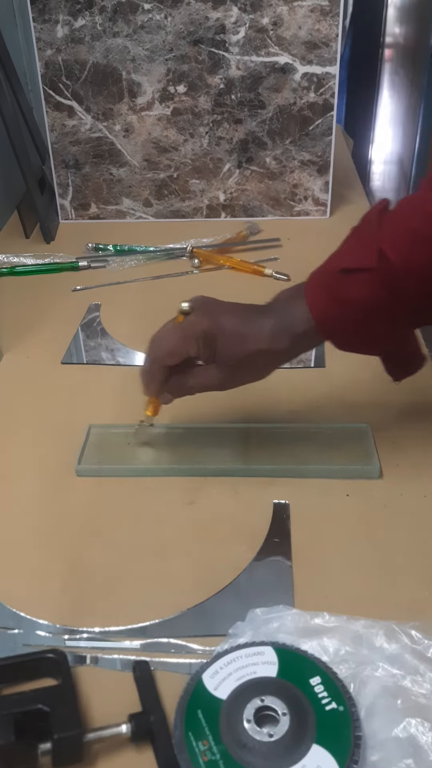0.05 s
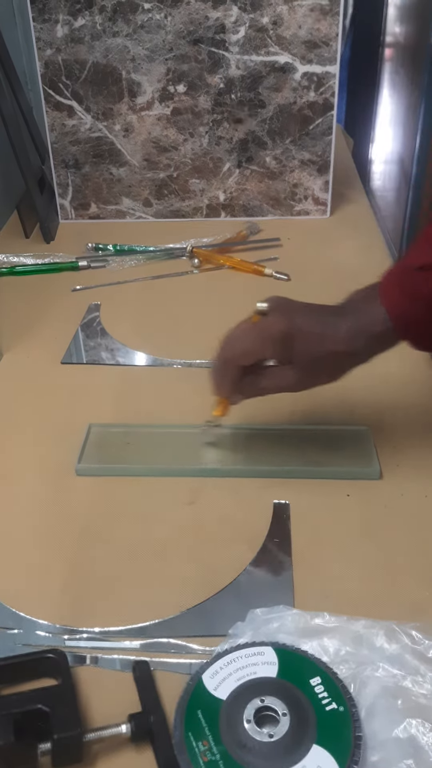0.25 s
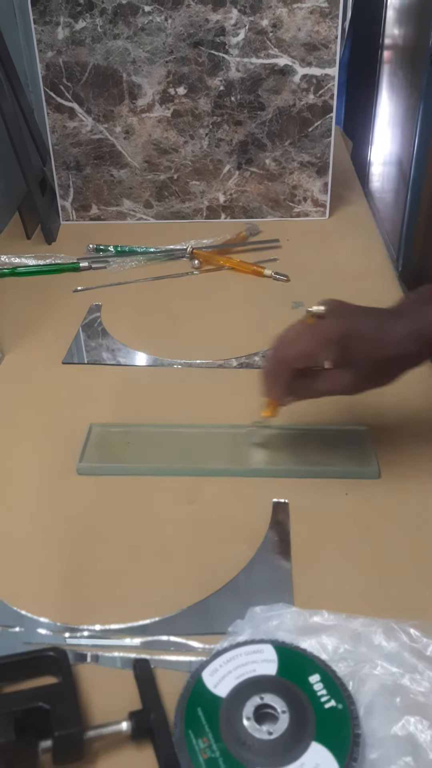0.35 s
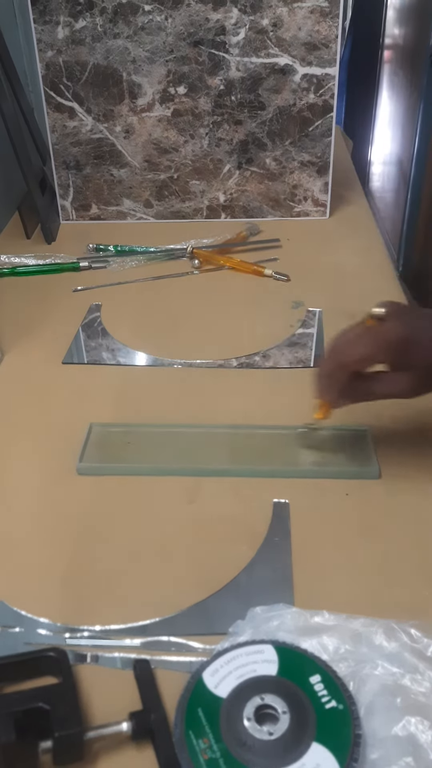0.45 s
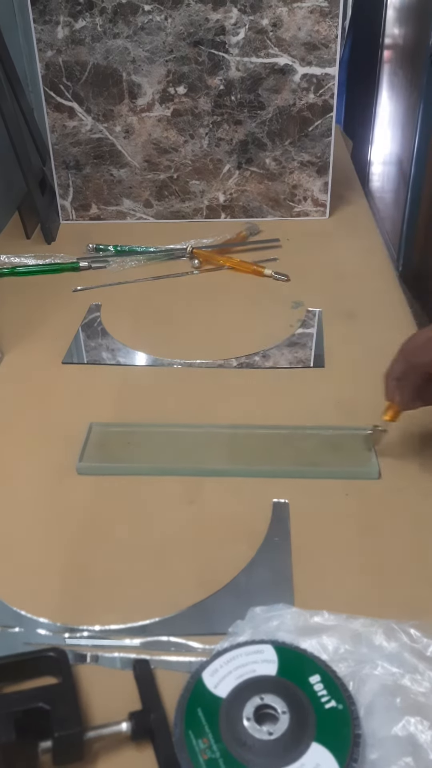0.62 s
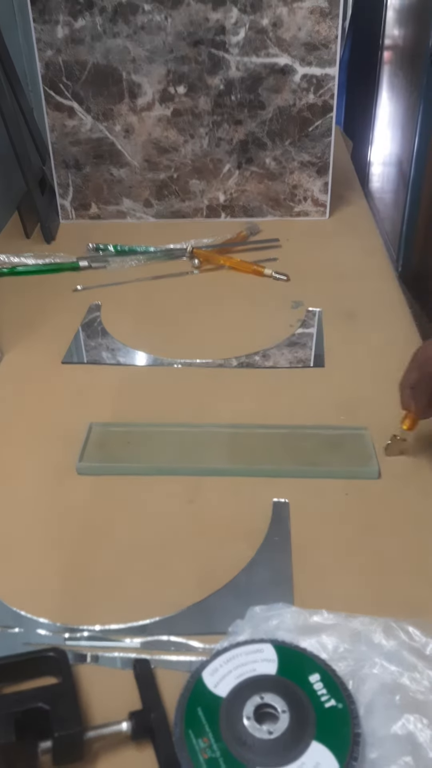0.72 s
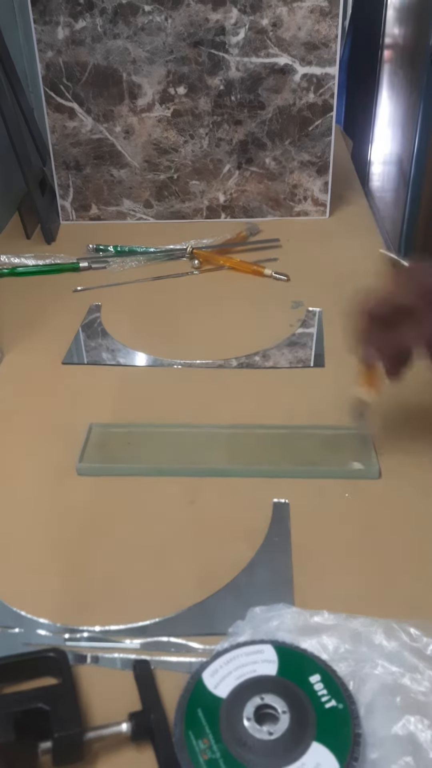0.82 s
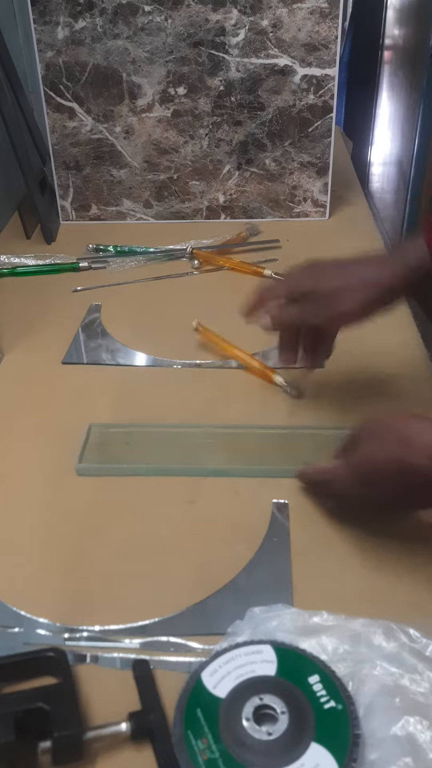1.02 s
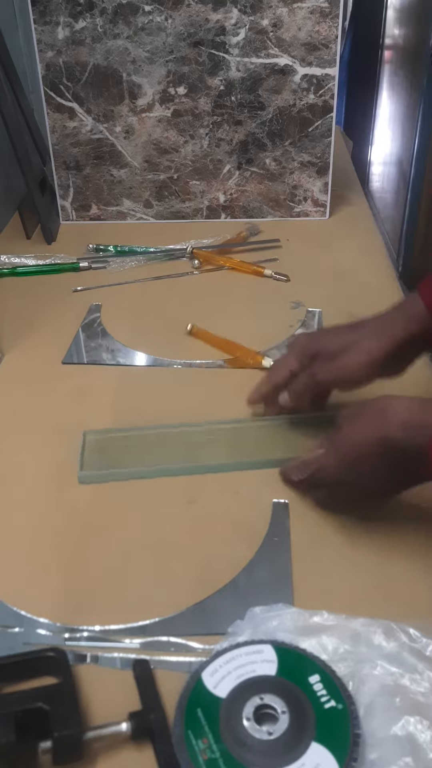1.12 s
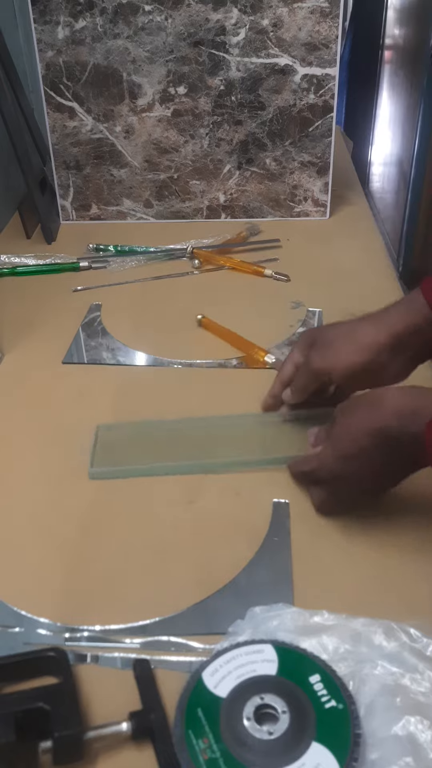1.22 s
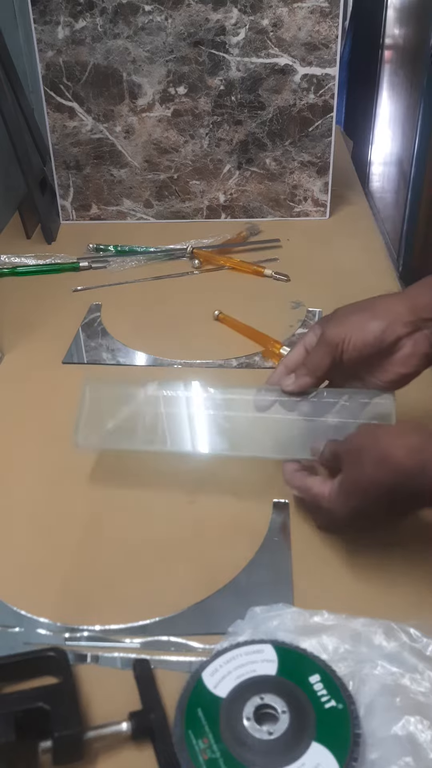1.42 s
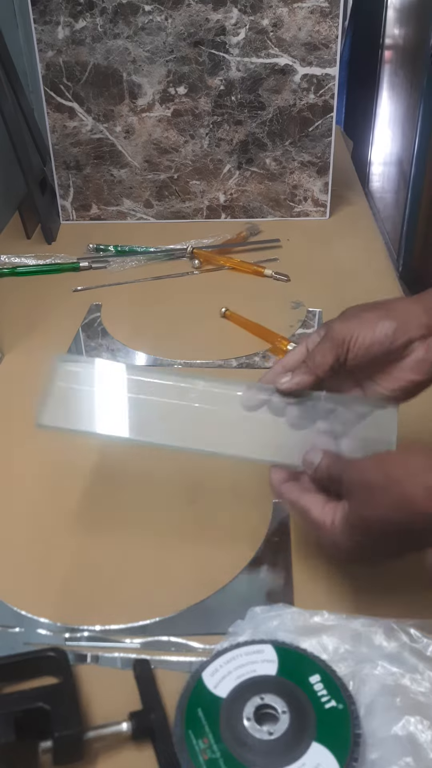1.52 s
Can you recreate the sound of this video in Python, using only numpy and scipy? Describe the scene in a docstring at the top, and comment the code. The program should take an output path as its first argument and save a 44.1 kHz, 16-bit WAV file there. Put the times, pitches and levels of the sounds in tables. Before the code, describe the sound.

A glass cutter scores a glass strip with a fine, squeaky hiss, then slips off the end and knocks the workbench. The tool is tossed down, clinking and rattling, heard close in a small room over low rumble.

```python
"""A workbench in a small hard room, heard from close by over a low rumble.
A glass cutter's wheel scores a strip of glass: tiny cracks make a fine hiss in which the strip's
bending modes swell, fade and squeak. The wheel runs off the end and knocks on the bench, and the
freed strip rings. The cutter is tossed aside, clinks and bounces; hands bump the bench to lift
the strip."""
import sys
import numpy as np
from scipy import signal
from scipy.fft import rfft, irfft
from scipy.io import wavfile

SR = 44100
rng = np.random.default_rng(int(sys.argv[2]) if len(sys.argv) > 2 else 0)


def generate_wav(sig):
    """Save sig (samples, or channels by samples) to the path in sys.argv[1] as 16-bit PCM at SR."""
    pcm = np.round(np.clip(np.atleast_2d(sig).T, -1, 1) * 32767).astype(np.int16)
    wavfile.write(sys.argv[1], SR, pcm)


N = 68355
T = np.arange(N) / SR

# room tone: (frequency [Hz], left [dB/Hz], right [dB/Hz])
ROOM_TONE = [(20, -94, -85), (46, -65.5, -64.5), (105, -52.5, -53.5), (148.5, -65, -60),
             (407, -64.5, -66.5), (604, -72, -72.5), (2230, -83, -83), (5200, -94.5, -93),
             (15300, -101, -103)]
# fader ride on the room tone: (time [s], gain [dB])
ROOM_TONE_FADE = [(0, 1.26), (1.15, 0.5), (1.45, -2)]
# stereo image of the noise layers: (frequency [Hz], left-right correlation [0-1])
CORRELATION = [(50, 0.56), (300, 0.65), (800, 0.22), (2000, 0.033), (6000, 0.029), (15000, 0.029)]

# hands bump bench and microphone: (peak time [s], level [dB], pitch [Hz], half length [s], pan [dB])
BUMPS = [(0.352, -24, 78, 0.0084, -21), (0.4862, -7, 116.5, 0.0065, -55), (0.631, -20.5, 87, 0.0061, -41),
         (.657, -18.5, 105, 0.0085, -6), (0.77, -21, 83.3, 0.0062, 25), (.834, -20.5, 150.6, 0.007, 16),
         (.839, -22, 75.6, 0.016, 34), (.954, -21, 221, 0.0066, -3.5), (1.032, -28.5, 151, 0.011, -5),
         (1.1052, -18, 106, 0.0085, 1), (1.2314, -11.5, 147, 0.0038, -3.5), (1.251, -21, 116, 0.011, -0.5),
         (1.408, -28.5, 62, 0.015, -19)]
# blows on the bench top: (time [s], level [dB], pan [dB], low cut [Hz])
KNOCKS = [(.650, -9, 18, 595), (.6607, 0.5, -4.5, 61), (.689, -15, 15, 213), (0.9887, -9, -1, 232),
          (1.008, -20.5, 0, 160)]
# body of the bench: (frequency [Hz], level [dB], t60 [s])
BENCH_MODES = [(63.7, -18, 0.33), (120.2, -28, 0.65), (210.2, -16.5, 0.16), (314.6, -12, 0.063),
               (422.8, -19, 0.16), (510, -19, 0.14), (539.4, -19, 0.14), (598, -27, 0.35),
               (660, -16.5, 0.065), (816, -16.5, 0.062)]
# dull thud of a knock: (frequency [Hz], level [dB/Hz])
THUD_SPECTRUM = [(40, -77), (130, -34.5), (400, -42.5), (750, -39.5), (1050, -56.5), (2200, -56),
                 (4000, -68), (12500, -70.5), (16000, -95)]

# ticks of glass chips and edges: (time [s], level [dB], pan [dB])
TICKS = [(.567, -5, 5), (.6618, 2, 11), (.8692, -4, 7)]
# their thin top end: (frequency [Hz], level [dB/Hz])
TICK_SPECTRUM = [(2000, -99), (8500, -101), (12500, -67), (16000, -69)]

# the handle taps down and rattles: (time [s], level [dB], pan [dB])
TAPS = [(1.1835, 4.5, 7), (1.1875, 3, 0.5), (1.214, -9, -7), (1.259, -7.5, -4)]
# click of a tap: (frequency [Hz], level [dB/Hz])
TAP_SPECTRUM = [(1200, -84), (2000, -64.5), (3200, -66.5), (4300, -68), (7500, -74), (13300, -77.5),
                (14800, -92)]
# ring of the handle: (frequency [Hz], level [dB], t60 [s])
TAP_MODES = [(2038, -35.5, 0.16), (5700, -59, 0.15)]

# the cutter lands and bounces: (time [s], level [dB], pan [dB])
CLINKS = [(.9888, -0.5, -2), (1.007, -12.5, 5), (1.1195, -21.5, -16), (1.184, -21, -4)]
# ring of the cutter's metal: (frequency [Hz], level [dB], t60 [s])
CLINK_MODES = [(1520, -29.5, 0.26), (1841, -38, 0.21), (2153, -28.5, 0.37), (2725, -31.5, 0.45),
               (2938, -28, 0.31), (3760, -29.5, 0.22), (4900, -28, 0.17), (5034, -37.5, 0.3),
               (5610, -29.5, 0.29), (5993, -46, 0.32), (6620, -17.5, 0.049), (6950, -13, 0.033),
               (7340, -29, 0.11), (8240, -33, 0.29), (8645, -35, 0.39), (8900, -25, 0.33),
               (9600, -33, 0.25), (10520, -27, 0.36), (12230, -24.5, 0.27), (12200, -28, 0.22),
               (13600, -20, 0.17), (14665, -32, 0.26)]
# stereo spread of that ring: (frequency [Hz], pan [dB])
CLINK_PAN = [(2100, -2), (2900, 12), (3800, -1), (5900, -4), (6800, -19), (8600, 13.5)]
# sharp attack of the contact: (frequency [Hz], level [dB/Hz])
CLINK_ATTACK = [(800, -43.5), (2000, -72), (4500, -50.5), (7200, -53), (9500, -52.5), (13500, -52.5),
                (15200, -64), (16200, -80)]
# the room's answer to a clink: (frequency [Hz], left [dB/Hz], right [dB/Hz])
CLINK_TAIL = [(494, -56, -51.5), (1230, -62.5, -63), (3050, -61, -56), (4150, -62.5, -66),
              (8400, -63.5, -61), (10600, -62.5, -76), (14400, -67, -67), (15800, -88, -85)]

# the wheel catches: (peak time [s], pitch [Hz], level [dB], half length [s], pan [dB])
SQUEAKS = [(0.303, 10630, -44, 0.013, 3), (0.388, 2385, -41, 0.015, -5), (0.402, 7300, -39, 0.008, -1),
           (0.511, 7290, -39, 0.023, -4), (0.607, 4590, -29.5, 0.0047, -8), (0.625, 4620, -33, 0.0063, -10)]
# the scoring gesture: (time [s], wheel position [share of the strip's length], pressure [dB])
STROKE = [(0, 0.166, -1), (0.092, 0.251, -1.5), (0.255, 0.423, 1.5), (0.435, 0.649, 2.5),
          (0.519, 0.842, 0.5), (0.587, 0.961, 3.5), (0.64, 0.992, -2.5)]
# hiss of the tiny cracks: (frequency [Hz], left [dB/Hz], right [dB/Hz])
CRACK_HISS = [(736, -82.5, -78.5), (2570, -82.5, -85.5), (4200, -78, -76), (5300, -77.5, -76),
              (6500, -82.5, -75.5), (8560, -84.5, -84), (9600, -90, -96), (11500, -88, -97),
              (13400, -90, -90), (14700, -79.5, -81), (15200, -82, -90), (16000, -108, -108)]
# the strip's bending modes, second to sixth: (frequency [Hz], width [Hz], level [dB], pan [dB])
BENDING_MODES = [(2333, 86, -49, -2), (4460, 150, -48, -7), (7315, 79, -53.5, -23),
                 (10580, 57.6, -55.5, 23), (14660, 45, -51, -15)]
# each bending mode as the strip springs free: (level [dB])
FREE_RING_DB = [-21.5, -27.5, -31.5, -39, -50]
# other modes of strip and cutter:
# (frequency [Hz], width [Hz], level [dB], pan [dB], growth from end to end [dB])
OTHER_MODES = [(3473, 130, -56, 3, -26), (5910, 360, -53.5, 5, 9), (9410, 32, -61.5, 21, -17)]

ROOM_T60_S, ROOM_BUILD_S, REVERB_DB = 0.44, 0.0025, -2.5


def from_db(db):
    return 10 ** (np.asarray(db) / 20)


def rms_one(x):
    return x / np.sqrt(np.mean(x ** 2) + 1e-20)


def pan(db):
    """Constant-power stereo gains; db is left minus right."""
    return rms_one(from_db([[db / 2], [-db / 2]]))


def butter(x, order, hz, kind):
    return signal.sosfilt(signal.butter(order, hz, kind, fs=SR, output="sos"), x)


def drift(rate_hz):
    """Smooth random modulation, rms 1."""
    pole = np.exp(-2 * np.pi * rate_hz / SR)
    return rms_one(signal.lfilter([1], [1, -2 * pole, pole * pole], rng.standard_normal(N + SR))[SR:])


def colour(white, spectrum):
    """Shapes two unrelated white signals into a stereo pair with the given spectrum."""
    log_hz = np.log(np.arange(N // 2 + 1) * SR / N + 1)
    hz, *channels = np.transpose(spectrum)
    gain = from_db([np.interp(log_hz, np.log(hz), db) for db in channels]) * np.sqrt(SR / 2)
    hz, alike = np.transpose(CORRELATION)
    alike = np.interp(log_hz, np.log(hz), alike)
    mid, side = rfft(white)
    stereo = np.sqrt((1 + alike) / 2) * mid + np.sqrt((1 - alike) / 2) * side * [[1], [-1]]
    return irfft(gain * stereo, N)


def noise(spectrum):
    return colour(rng.standard_normal((2, N)), spectrum)


def metallic_noise(spectrum, spacing_hz=44.13, spread_db=4):
    """Noise gathered into the metal's crowd of weak, narrow partials."""
    hz = np.arange(N // 2 + 1) * SR / N
    heights = np.minimum(rng.standard_normal(4000), 2)
    ripple = from_db(spread_db * np.interp(hz / spacing_hz, np.arange(len(heights)), heights))
    rippled = irfft(rfft(rng.standard_normal((2, N))) * rms_one(ripple), N)
    return colour(rippled, spectrum)


def decay(s, t60):
    """Starts at time s and falls 60 dB every t60 seconds."""
    return (T >= s) * 1000. ** (-np.maximum(T - s, 0) / t60)


def attack(s, build_s):
    """Fades in from time s."""
    return 1 - np.exp(-np.maximum(T - s, 0) / build_s)


def swell(s, half_s):
    """Bell-shaped envelope peaking at time s."""
    return 1 / np.cosh(np.clip(np.pi / 2 * (T - s) / half_s, -50, 50))


def bursts(hits, t60):
    """Stereo envelope of a series of dying hits."""
    return np.sqrt(sum((from_db(db) * pan(pan_db) * decay(s, t60)) ** 2 for s, db, pan_db in hits))


def ring(s, hz, t60):
    return decay(s, t60) * np.sin(2 * np.pi * hz * (T - s))


def resonate(x, hz, width):
    """A resonance with steep skirts, rms 1."""
    return rms_one(butter(x, 2, [hz - width / 2, hz + width / 2], "band"))


def detune(x, shift_hz):
    """Slides a narrow band up or down in pitch."""
    return np.real(signal.hilbert(x) * np.exp(2j * np.pi * np.cumsum(shift_hz) / SR))


def room_tail(hits):
    """Envelope of the room's answer to a series of hits."""
    tails = (from_db(db) * decay(s, ROOM_T60_S) * attack(s, ROOM_BUILD_S) for s, db, _ in hits)
    return np.sqrt(sum(tail ** 2 for tail in tails))


def in_room(x):
    """Adds diffuse reflections, different on each side."""
    response = rng.standard_normal((2, N)) * decay(ROOM_BUILD_S, ROOM_T60_S)
    response /= np.sqrt(np.sum(response ** 2, axis=1, keepdims=True))
    return x + from_db(REVERB_DB) * signal.fftconvolve(x, response, axes=1)[:, :N]


def room_tone():
    """A bed of low rumble and faint hiss that eases down at the end."""
    return noise(ROOM_TONE) * from_db(np.interp(T, *np.transpose(ROOM_TONE_FADE)))


def hand_bumps(overtone_ratio=2.09, overtone_db=-13):
    """Hands make soft, low thuds of a few cycles, with a weak overtone."""
    out = 0
    for s, db, hz, half_s, pan_db in BUMPS:
        phase = 2 * np.pi * hz * (T - s)
        tone = np.sin(phase) + from_db(overtone_db) * np.cos(overtone_ratio * phase)
        out += from_db(db) * pan(pan_db) * swell(s, half_s) * tone
    return out


def bench_knocks(room_db=-11.5, stereo_skew_s=0.00044):
    """Each knock thuds and rings the bench top; light blows barely stir its lowest modes."""
    out = 0
    for s, db, pan_db, low_cut_hz in KNOCKS:
        blow = [(s, db, pan_db)]
        thud = noise(THUD_SPECTRUM) * (bursts(blow, t60=0.035) + from_db(room_db) * room_tail(blow))
        body = 0
        for hz, mode_db, t60 in BENCH_MODES:
            level = from_db(db + mode_db + rng.normal(0, 1))
            body += level * ring(s + rng.random((2, 1)) * stereo_skew_s, hz, t60)
        out += butter(thud - pan(pan_db) * body, 2, low_cut_hz, "high")
    return out


def glass_ticks():
    """Chips and edges of the glass give short, thin ticks."""
    return noise(TICK_SPECTRUM) * bursts(TICKS, t60=0.011)


def handle_taps(room_db=-15.5):
    """The handle settles with a dry double click and a rattle; the first tap sets it ringing."""
    envelope = bursts(TAPS, t60=0.025) + from_db(room_db) * room_tail(TAPS)
    clicks = metallic_noise(TAP_SPECTRUM) * envelope
    first_s = TAPS[0][0]
    rings = sum(from_db(db) * ring(first_s + rng.random((2, 1)) / hz, hz, t60)
                for hz, db, t60 in TAP_MODES)
    return clicks + in_room(rings)


def cutter_clinks(top_waver_rad=2.3):
    """Each landing gives a crack, a metallic ring blurred by rattling, and a bright room tail."""
    out = noise(CLINK_ATTACK) * bursts(CLINKS, t60=0.028)
    out += metallic_noise(CLINK_TAIL) * room_tail(CLINKS)
    top_hz = CLINK_MODES[-1][0]
    for hz, db, t60 in CLINK_MODES:
        pan_db = np.interp(hz, *np.transpose(CLINK_PAN))
        waver = top_waver_rad * (hz / top_hz) ** 2 * drift(65)
        phase = 2 * np.pi * (hz * T + rng.random((2, 1)) / 2) + waver
        out += from_db(db) * pan(pan_db) * bursts(CLINKS, t60) * np.sin(phase)
    return out


def freed_strip(edge_s, room_db=-17.5):
    """The wheel drops off the edge; the strip rings freely and lingers in the room."""
    tail = from_db(room_db) * decay(edge_s, ROOM_T60_S)
    envelope = attack(edge_s, build_s=0.0029) * np.hypot(decay(edge_s, t60=0.13), tail)
    tones = 0
    for (hz, _, _, pan_db), db in zip(BENDING_MODES, FREE_RING_DB):
        phase = 2 * np.pi * (hz * T + rng.random((2, 1)) / 4)
        tones += from_db(db) * pan(pan_db) * np.sin(phase)
    return envelope * tones


def wheel_squeaks(waver_hz=20.4):
    """Where the wheel catches, one mode sings out in a brief, wavering tone."""
    out = 0
    for s, hz, db, half_s, pan_db in SQUEAKS:
        phase = 2 * np.pi * np.cumsum(hz + waver_hz * drift(71)) / SR
        out += from_db(db) * pan(pan_db) * swell(s, half_s) * np.sin(phase)
    return in_room(out)


def micro_cracks(per_s=5000, spread_db=2):
    """A dense run of tiny fractures of uneven size, rms 1."""
    sizes = from_db(spread_db * np.minimum(rng.exponential(1, N), 5)) * rng.choice([-1, 1], N)
    return rms_one(sizes * (rng.random(N) < per_s / SR))


def strip_bending(position, node_leak=0.71, flare_db=0.5, stiffen_hz=45.06, wander_share=0.345):
    """Cracks drive the bending modes; each dips in level and pitch as the wheel crosses its nodes."""
    out = 0
    for order, (hz, width, db, pan_db) in enumerate(BENDING_MODES, start=2):
        shape = np.cos((order + .5) * np.pi * position + np.pi / 4)   # zero at a node
        drive = np.hypot(shape, node_leak) * from_db(flare_db * drift(23))   # flares as the wheel bites
        shift_hz = stiffen_hz * shape ** 2 + wander_share * width * drift(7.9)
        mode = detune(resonate(micro_cracks(), hz, width), shift_hz)
        out += from_db(db) * pan(pan_db) * drive * mode
    return out


def wheel_scoring(edge_s, release_s=0.011, judder_db=1.1, rasp_hz=(4700, 11000), rasp_growth_db=2.5):
    """The glass cracks under the wheel: hiss and resonances ride the pressure up to the edge."""
    times, positions, pressures_db = np.transpose(STROKE)
    position = np.interp(T, times, positions)
    pressure = from_db(np.interp(T, times, pressures_db) + judder_db * drift(58))
    release = np.exp(-np.maximum(T - edge_s, 0) / release_s)
    hiss = colour(np.array([micro_cracks(), micro_cracks()]), CRACK_HISS)
    # the rasp band starts ducked and opens up along the strip
    hiss += butter(hiss, 1, rasp_hz, "band") * (from_db(rasp_growth_db * (position - 1)) - 1)
    modes = strip_bending(position)
    for hz, width, db, pan_db, growth_db in OTHER_MODES:
        level = from_db(db + growth_db * (position - .5))
        modes += level * pan(pan_db) * resonate(micro_cracks(), hz, width)
    return in_room((hiss + modes) * pressure * release)


def scene():
    """The cut up front, then the handling at the bench, all over the room tone."""
    edge_s = 0.649   # the wheel reaches the end of the strip
    cut = wheel_scoring(edge_s) + wheel_squeaks() + freed_strip(edge_s)
    handling = bench_knocks() + hand_bumps() + cutter_clinks() + handle_taps() + glass_ticks()
    return cut + handling + room_tone()


def record(dry, low_cut_hz=36, ceiling=1.2, high_cut_hz=15900):
    """Master chain: low cut, soft saturation on the peaks, steep high cut."""
    thinned = butter(dry, 2, low_cut_hz, "high")
    rounded = ceiling * np.tanh(thinned / ceiling)
    return signal.sosfilt(signal.ellip(10, .1, 80, high_cut_hz, fs=SR, output="sos"), rounded)


dry = scene()
out = record(dry)
generate_wav(out)
```